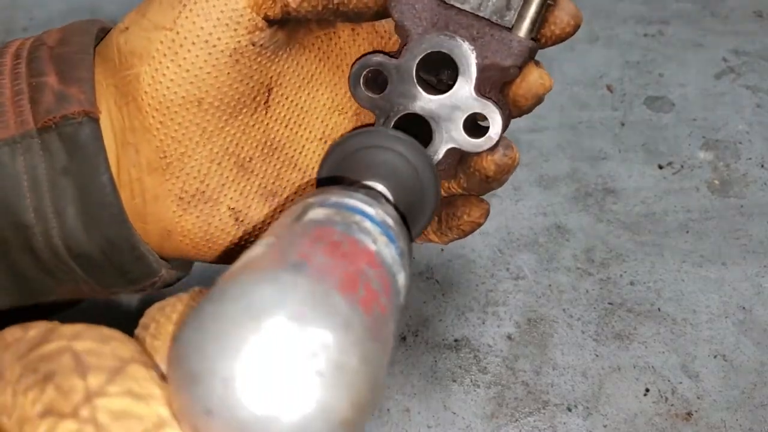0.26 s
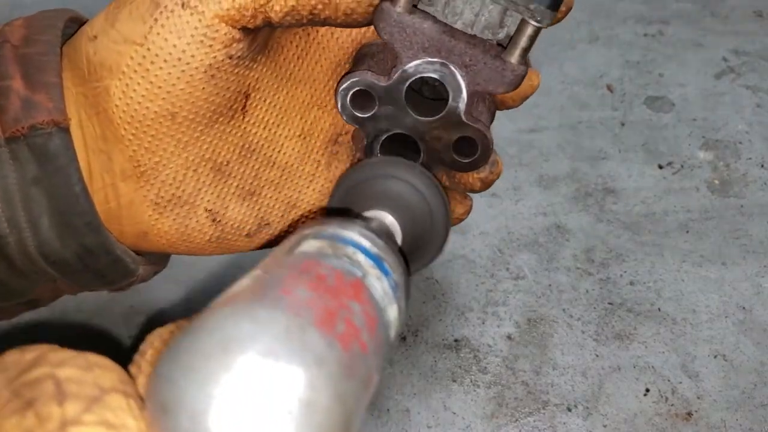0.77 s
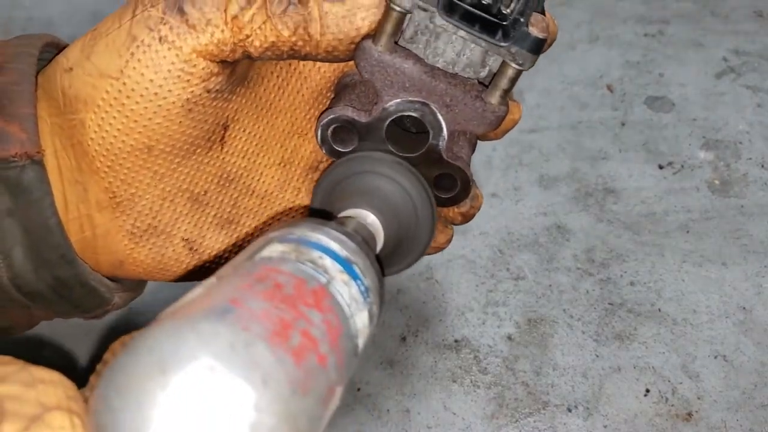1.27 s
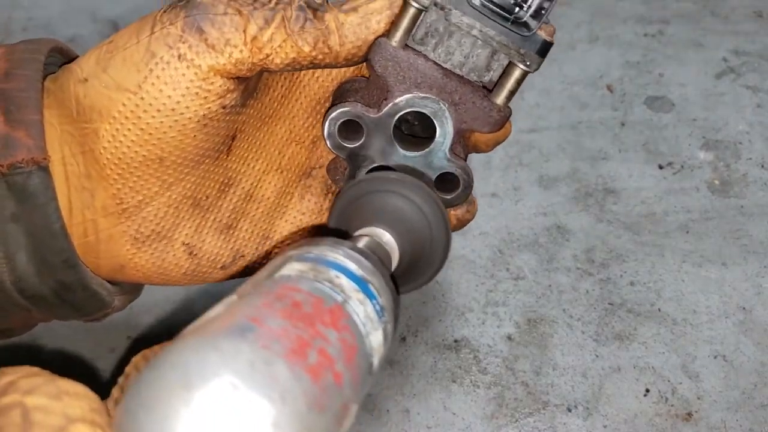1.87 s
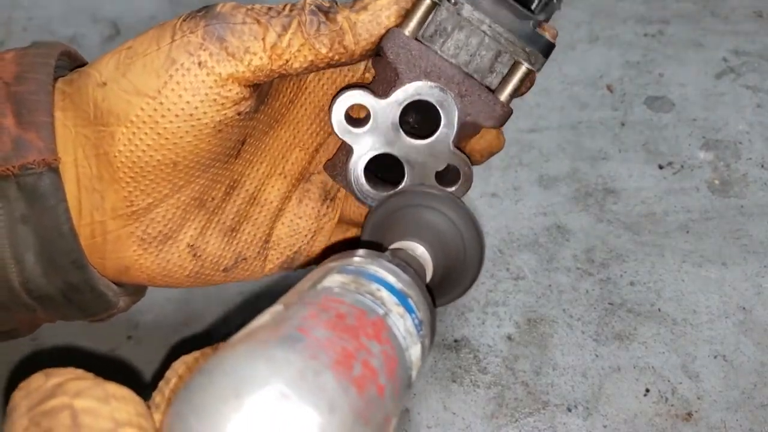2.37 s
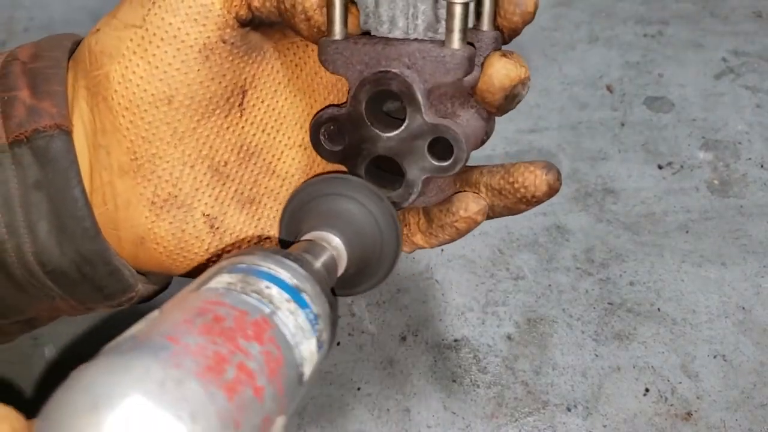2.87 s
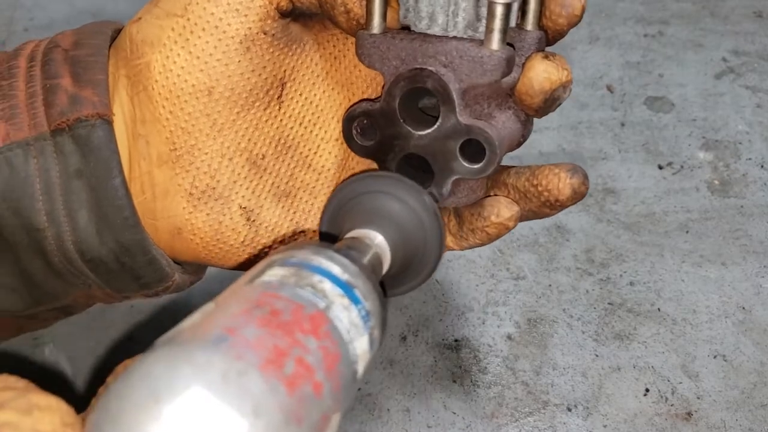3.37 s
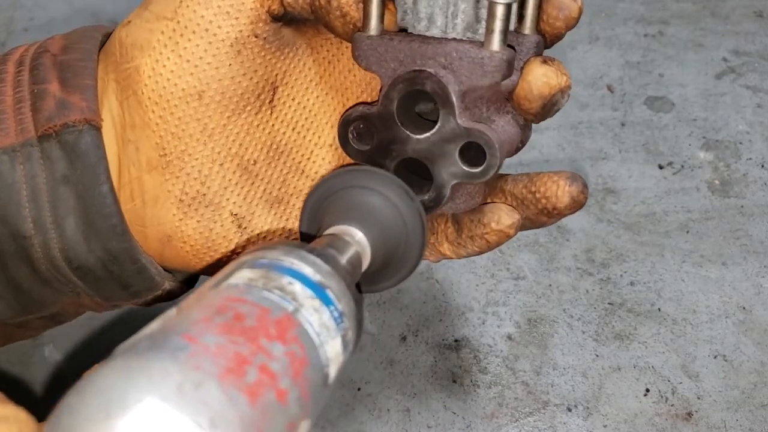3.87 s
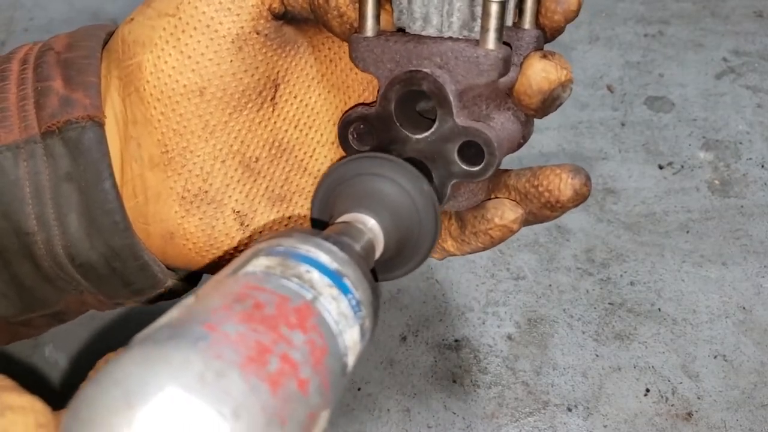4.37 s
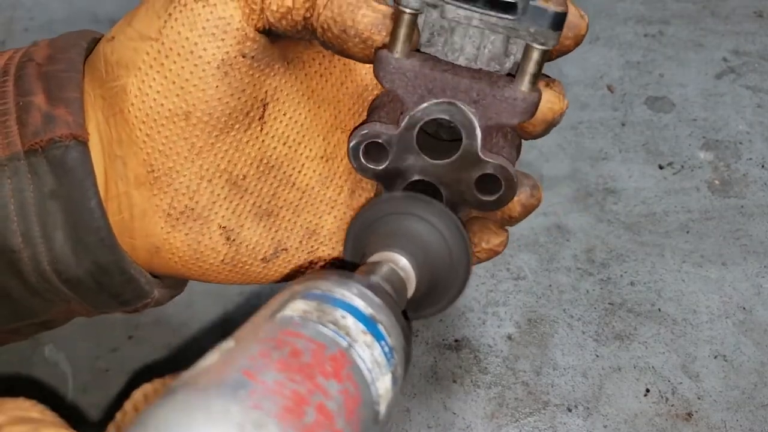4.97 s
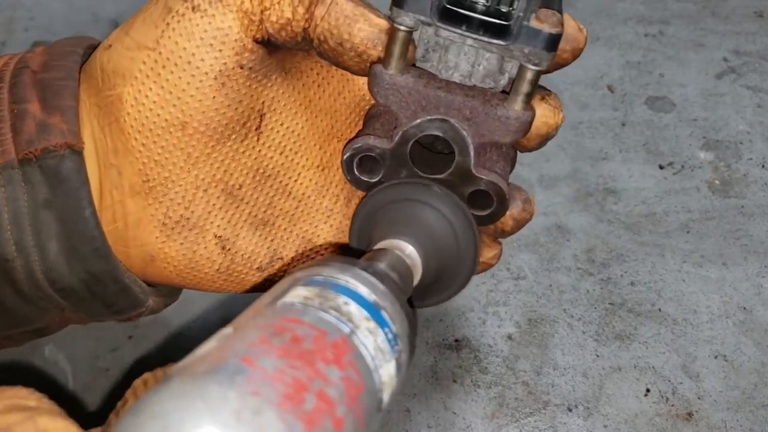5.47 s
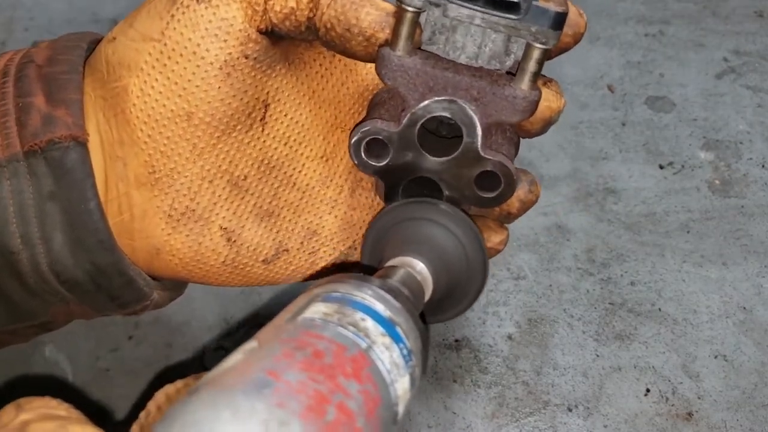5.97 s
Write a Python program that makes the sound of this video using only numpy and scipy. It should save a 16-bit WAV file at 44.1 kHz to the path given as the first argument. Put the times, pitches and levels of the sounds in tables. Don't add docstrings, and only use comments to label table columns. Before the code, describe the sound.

A pneumatic grinder hisses loudly near the microphone, heavier on the left, with a gritty motor buzz and disc scrape. Pressed hard at first, it growls low; after a short release with a puff of air it restarts with a higher whine. The pitch slides down, a high metallic squeal rises, and a second quick release follows. The last run starts highest and sags. Faint room tone shows in the gaps.

```python
import sys
import numpy as np
from scipy import signal
from scipy.fft import rfft, irfft
from scipy.io import wavfile
from scipy.ndimage import uniform_filter1d

SR = 44100
rng = np.random.default_rng(int(sys.argv[2]) if len(sys.argv) > 2 else 0)


def boost(x):
    u = np.asarray(x, float) / 20
    return 10 ** u


def materialize(psi):
    bounded = np.clip(np.atleast_2d(psi).T, -1, 1)
    quanta = np.round(bounded * 32767).astype(np.int16)
    wavfile.write(sys.argv[1], SR, quanta)


N = 274302
STEP = 16
MID_HZ = 550

# [freq_hz, lead_rad]
PORT_LEAD = [(0, -4), (250, 0.2), (1290, 1.5), (2930, 6.5), (5860, 4), (16700, 14.5)]
# [let_go_s, eased_open_s, full_speed_s, shake_down_db, shake_up_db]
RELEASES = [
    (2.5, 2.63, 2.76, -27, -54),
    (4.631, 4.735, 4.787, -43, -46),
]
# [time_s, rub_db]
PRESSURE = [(0, -46), (.88, -45), (.96, -34.5), (1.1, -37), (1.27, -32), (1.52, -38.5), (1.65, -35),
            (1.75, -42), (2.2, -40.5), (2.44, -36.5), (2.76, -49.5), (3.06, -48), (3.4, -50), (4.3, -52),
            (4.58, -46), (5.2, -48), (5.35, -41.5), (6.22, -45)]


def evened(x):
    return x / np.sqrt(np.mean(x ** 2) + 1e-20)


def read(points, hz):
    f, value = np.transpose(points)
    return np.interp(np.log(hz + 1), np.log(f + 1), value)


def curves(tables, t):
    s, *columns = np.concatenate(tables).T
    return [np.interp(t, np.maximum.accumulate(s), c) for c in columns]


def hump(hz, centre_hz, width_hz):
    return 1 / (1 + (2 * (hz - centre_hz) / width_hz) ** 2)


def full(control):
    return np.interp(np.arange(N), np.arange(0, N, STEP), control)


def pieces(count, fade_s=0.011, mean_s=.045):
    draws = rng.standard_normal((400, 1 + count))
    ends_s = np.cumsum(mean_s * np.exp(.5 * draws[:, 0]))
    index = np.searchsorted(ends_s, np.arange(0, N, STEP) / SR)
    stepped = draws[index.clip(0, len(ends_s) - 1), 1:]
    return uniform_filter1d(stepped, 1 + int(fade_s * SR / STEP), axis=0).T


def resonate(x, hz, width_hz):
    turn = np.exp(2j * np.pi * np.cumsum(hz) / SR)
    r = np.exp(-np.pi * width_hz / SR)
    once = signal.lfilter([1 - r], [1, -r], x / turn + 1e-18)
    twice = signal.lfilter([1 - r], [1, -r], once)
    return evened((turn * twice).real)


def held(t):
    # [time_s, shaft_hz, flow_db]
    stretches = [
        [(0, 456.6, -31), (.45, 467.7, -31), (.87, 448.8, -32), (1.08, 416.3, -32.5), (1.72, 420.1, -30),
         (2.47, 417.2, -31)],
        [(2.78, 673.2, -29), (3.57, 650.7, -29.5), (3.68, 620.2, -29), (3.85, 605.5, -30.5), (4.12, 597.2, -30),
         (4.46, 538.4, -32)],
        [(4.81, 714, -29), (4.93, 700, -28), (5.3, 574.5, -29.5), (5.62, 594.2, -29), (5.89, 537.5, -29),
         (6.07, 554, -28.5)],
    ]
    stretch = np.searchsorted([row[0] + .05 for row in RELEASES], t)
    return np.choose(stretch, [curves([table], t) for table in stretches])


def trigger(t):
    bleed_db, bleed_s, drain_db_per_s = -5, 0.015, 138
    coast_s, crawl = .055, .22
    shake_hz, shake_power = 394, 2.8
    eased_db, ease_s, opening_s, surge_db, surge_s = -8.5, 0.059, 0.021, 2.5, .04
    hz, flow_db = held(t)
    drop_db, shut, shake = np.zeros((3, len(t)))
    for off_s, eased_s, full_s, down_db, up_db in RELEASES:
        since_s = np.maximum(t - off_s, 0)
        open_s = (eased_s + full_s) / 2
        u = np.clip((t - eased_s) / (full_s - eased_s), 0, 1)
        spin = u ** 2 * (3 - 2 * u)
        before_hz, after_hz = held(np.array([off_s, full_s]))[0]
        coast_hz = before_hz * (crawl + (1 - crawl) * np.exp(-since_s / coast_s))
        hz = np.where((t > off_s) & (t < full_s), coast_hz * (1 - spin) + after_hz * spin, hz)

        closing = np.clip((t - off_s) / bleed_s + 1, 0, 1)
        opening = np.clip((t - open_s) / opening_s + .5, 0, 1)
        easing = np.clip((t - eased_s) / ease_s + .5, 0, 1)
        trapped = boost(bleed_db * closing - drain_db_per_s * since_s)
        eased = boost(eased_db) * easing
        surge = boost(surge_db * np.exp(-(np.maximum(t - open_s - surge_s, 0) / surge_s) ** 2))
        drop_db += 20 * np.log10(np.hypot(trapped, eased) * (1 - opening) + surge * opening)
        shut += closing * (1 - easing) ** 2

        running_down = boost(down_db) * np.clip(since_s / bleed_s, 0, 1) * (1 - u) ** 2
        running_up = boost(up_db) * np.sin(np.pi * spin)
        shake += (running_down + running_up) * np.minimum(hz / shake_hz, 1) ** shake_power
    return hz, flow_db, drop_db, shut, shake


def running(share):
    drop_db = trigger(np.arange(0, N, STEP) / SR)[2]
    return boost(share * full(np.minimum(drop_db, 0)))


def shaft(t):
    hz, _, drop_db, _, shake = trigger(t)
    fast_hz = hz - MID_HZ
    fade_db = 1.4 * np.minimum(drop_db, 0)
    unbalance = boost(-47.5 - 0.015 * fast_hz + fade_db) + shake
    vane_db = -41 + .09 * np.minimum(fast_hz, 110) + fade_db
    over_db = -49 + .025 * fast_hz + fade_db
    return hz, 20 * np.log10(unbalance), vane_db, over_db


def air(t):
    _, flow_db, drop_db, shut, _ = trigger(t)
    fast_hz = held(t)[0] - MID_HZ
    low_db = 2.5 - 0.0038 * fast_hz + 9 * uniform_filter1d(shut, size=5) + np.maximum(drop_db, 0)
    rumble_db = 0.5 - 0.017 * fast_hz - 1.05 * np.minimum(drop_db, 0) - 2.5 * shut
    return flow_db + drop_db, low_db, rumble_db


def garage(level_db=-51.5):
    # [freq_hz, level_db]
    room = [(30, -12), (150, -0.5), (600, -6.5), (1200, -0.5), (2000, -12), (5000, -13), (15000, -19)]
    a, b = rng.standard_normal((N, 2)).T
    both = rfft(np.array([a + 0.54 * b, a - 0.73 * b])) * boost(read(room, np.fft.rfftfreq(N, 1 / SR)))
    return boost(level_db) * evened(irfft(both, N))


def valve():
    # [time_s, half_length_s, level_db, centre_hz, width_hz]
    puffs = [
        (4.642, .017, -29, 2900, 900),
        (2.1, 0.013, -36.5, 2340, 900),
        (2.51, .01, -33, 1160, 300),
    ]
    t, out = np.arange(N) / SR, np.zeros((2, N))
    length = int(.13 * SR)
    for s, half_s, db, hz, width_hz in puffs:
        near = slice(int((s - .06) * SR), int((s + .06) * SR))
        swell = np.exp(-((t[near] - s) / half_s) ** 2)
        for side, side_db in enumerate([3., -4.]):
            band = resonate(rng.standard_normal(length), np.full(length, float(hz)), width_hz)
            out[side, near] += boost(db + side_db) * band[:len(swell)] * swell
    return out


def sing(hz=4570., width_hz=170, edge_s=.04):
    # [from_s, to_s, level_db]
    spells = [
        (5.02, 5.8, -37),
    ]
    t = np.arange(N) / SR
    size = sum(boost(db) * np.clip(np.minimum(t - a, b - t) / edge_s, 0, 1) for a, b, db in spells)
    tone = resonate(rng.standard_normal(N), np.full(N, hz), width_hz)
    return size * tone * boost(np.array([[3.], [-4.]]))


def squeal(waver_db=2.5):
    # [time_s, ring_db]
    fits = [
        (0, -44),
        (2.4, -43),
        (2.9, -44),
        (4.1, -28),
        (4.6, -45),
        (5.6, -35),
        (6.22, -35),
    ]
    ring_db = curves([fits], np.arange(N) / SR)[0] + waver_db * full(pieces(count=1)[0])
    ring = boost(ring_db) * resonate(rng.standard_normal(N), np.full(N, 10740.), 150.7)
    return ring * running(1.2) * boost(np.array([[-3.], [-19.]]))


def disc(width_hz=170, wobble_hz=35):
    db = curves([PRESSURE], np.arange(N) / SR)[0]
    hz = 1345 + 6 * (db + 45) + wobble_hz * full(pieces(count=1)[0])
    near, far = (resonate(rng.standard_normal(N), hz, width_hz) for _ in range(2))
    return boost(db) * running(1.7) * np.array([boost(2) * near, boost(-12) * far])


def motor(wander=.004, jump_rad=1.76, waver_db=1.24, high_waver_db=4.0, rough=0.19, rough_s=.006):
    # [shaft_multiple, pressed_hard_db, running_light_db, last_stretch_db, right_port_db]
    orders = [(.5, -9, -12, -16.5, -1.5), (1.62, -5.5, .5, -2.5, -6), (2, -8.5, -3.5, -0.5, 1.5),
              (2.5, 0.5, 2, 0, -6), (3, 9, -10, -10, -1), (5, 9, 4.5, -4, -3.5), (6, 2, -4, -0.5, 0.5),
              (7, -13, 2.5, -14, -5), (9, 8, -12.5, -11, -23)]
    # [freq_hz, width_hz, left_db, right_db]
    housing = [(4590, 570, -1, -6), (7600, 400, -1, -12), (10760, 330, -0.5, -14), (12350, 900, 2, .5)]
    nose = {5: (2800, 400, 8), 7: (4500, 700, 10)}
    light_from_s, last_from_s = 2.6, 4.72
    t = np.arange(0, N, STEP) / SR
    hz, unbalance_db, vane_db, over_db = shaft(t)
    last = np.clip((t - last_from_s) * 20, 0, 1)
    light = np.clip((t - light_from_s) * 20, 0, 1)

    rows = [(1, unbalance_db, -1.0), (4, vane_db - .5 + 2.2 * last, -10.0)]
    rows.append((1.75, unbalance_db - 4 - 40 * np.clip((hz - 330) / 60, 0, 1), -5))
    for k, hard_db, soft_db, late_db, right_db in orders:
        db = over_db + hard_db + light * (soft_db - hard_db) + last * (late_db - soft_db)
        rows.append((k, db, right_db))
    sizes = []
    for k, db, right_db in rows:
        if k in nose:
            centre_hz, width_hz, lift_db = nose[k]
            db = db + light * lift_db * hump(k * hz, centre_hz, width_hz)
        sizes.append((k, boost(db), boost(db + right_db), waver_db))

    drive = boost(over_db + 7.3 * (0.5 + light) - 2.0 * last)
    for k in [8, *range(10, 28)]:
        shapes = [(hump(k * hz, f, w) ** 2, l_db, r_db) for f, w, l_db, r_db in housing]
        left = drive * sum(h * boost(l_db) for h, l_db, _ in shapes)
        right = drive * sum(h * boost(r_db) for h, _, r_db in shapes)
        sizes.append((k, left, right, high_waver_db))

    off, *chance = pieces(count=1 + 2 * len(sizes))
    stumble = .018 * (1 - light) * np.clip((curves([PRESSURE], t)[0] + 45) / 4, 0, 1)
    turn = 2 * np.pi * np.cumsum(full(hz * (1 + (wander + stumble) * off))) / SR
    grit = rng.standard_normal((len(t), len(sizes), 2))
    shake = evened(uniform_filter1d(grit, 1 + int(rough_s * SR / STEP), axis=0))
    out = np.zeros((2, N))
    for j, (k, left, right, spread_db) in enumerate(sizes):
        size = np.sqrt(2) * boost(spread_db * chance[2 * j + 1]) * np.exp(1j * jump_rad * chance[2 * j])
        size = size * (1 + rough * (1 + k / 12) * (shake[:, j, 0] + 1j * shake[:, j, 1]))
        ports = np.array([left * size, right * size * np.exp(-1j * read(PORT_LEAD, k * hz))])
        out += (np.repeat(ports, STEP, axis=1)[:, :N] * np.exp(1j * k * turn)).imag
    return out


def exhaust(patchy_db=1.0, flicker_db=0.82, base_db=6.0, drift_rad=1.9, comb_db=0.5):
    # [freq_hz, level_db]
    left_path = [(30, -17), (150, -13), (400, -13), (750, -22.5), (1200, -9.5), (1850, -10), (2500, -3.5),
                 (3200, -7.5), (5100, -5), (6000, -0.5), (8400, -7), (10200, 1), (13000, 1.5), (15700, 1.5)]
    right_path = [(30, -14), (150, -7), (400, -16), (750, -9.5), (1200, -14), (1800, -8), (2400, -2),
                  (4000, -8), (5700, -12.5), (6700, -4.5), (9500, -1.5), (11700, 2), (13300, 2.5),
                  (15700, 3.5)]
    # [freq_hz, width_hz, left_db, right_db]
    body = [(4530, 355, 7, 13.5), (7486, 620, 8, 6), (12400, 750, 1.5, 4), (4270, 250, 3, 6.5),
            (11700, 600, -2, 2.5), (610, 84, -0.5, -0.5), (1860, 270, -5.5, -3), (3370, 260, -3.5, 3.5),
            (5080, 160, -4, 1)]
    # [freq_hz, likeness_0_to_1]
    likeness = [(60, 1), (300, 0.62), (800, 0.75), (1500, 0.32), (3000, 0.58), (6000, 0.39), (15000, 0.44)]
    # [time_s, left_over_right_db]
    balance = [(0, 6.5), (1.2, 7), (1.8, 5), (2.8, 6.5), (4.5, 6), (6.22, 4.5)]
    frames, hz = N // 128 + 5, np.fft.rfftfreq(512, 1 / SR)
    t = np.arange(frames) * 128 / SR
    a, b, c, d, patches, drift = rng.standard_normal((frames, 257, 6)).T
    drift = evened(uniform_filter1d(uniform_filter1d(drift, 6, 0), 80, 1))
    drift = drift * drift_rad * (hz / (hz + 900))[:, None]
    patches = evened(uniform_filter1d(uniform_filter1d(patches, 5, 0), 25, 1))
    flicker = evened(uniform_filter1d(rng.standard_normal(frames), 2))

    same = np.clip(read(likeness, hz), 0, 1)[:, None]
    left = a + 1j * b
    shared = same * left * np.exp(-1j * (read(PORT_LEAD, hz)[:, None] + drift))
    right = shared + np.sqrt(1 - same ** 2) * (c + 1j * d)

    flow_db, low_db, rumble_db = air(t)
    deep = (1 / (1 + (hz / 260) ** 4))[:, None]
    low = (1 / (1 + (hz / 5000) ** 6))[:, None] - deep
    field_db = patchy_db * patches + flicker_db * flicker + low * low_db + deep * rumble_db
    speed_hz = shaft(t)[0]
    comb = np.cos(2 * np.pi * hz[:, None] / speed_hz)
    field_db += comb_db * low * comb * np.clip((speed_hz - 330) / 60, 0, 1)

    out = []
    for k, (z, path) in enumerate([(left, left_path), (right, right_path)]):
        colour = boost(read(path, hz) + sum(m[2 + k] * hump(hz, *m[:2]) for m in body))
        level = boost(flow_db + base_db + curves([balance], t)[0] * (1.0 - k)) / np.sqrt(np.mean(colour ** 2))
        spectrum = z * colour[:, None] * boost(field_db) * level
        out.append(signal.istft(spectrum, nperseg=512, noverlap=384)[1][:N] / 16)
    return np.array(out)


def splices(step_db=-0.1, depth=0.59):
    # [time_s, depth_db, width_ms]
    gaps = [(0.286, 23, 7.4), (.408, 5, 7), (.515, 3.5, 16), (.746, 8, 8.9), (.793, 15, 7.8),
            (0.93, 4, 7.4), (1.036, 6, 8.6), (1.123, 2, 9), (1.255, 2, 6.1), (1.395, 11, 2.5),
            (1.617, 6, 7), (1.794, -2, 4), (2.207, 1, 3.8), (2.414, 14, 7.3), (2.957, 2, 3.59),
            (3.785, 9, 7.2), (3.929, 3, 7), (4.597, 11, 8.5), (5.217, 3, 4), (5.504, 8.5, 11.8)]
    t, db = np.arange(N) / SR, step_db * full(pieces(count=1)[0])
    for s, depth_db, ms in gaps:
        near = slice(max(int((s - .03) * SR), 0), int((s + .03) * SR))
        db[near] -= depth * depth_db * np.exp(-(2000 * (t[near] - s) / ms) ** 4)
    return boost(db)


def scene():
    tool = exhaust() + motor() + disc() + squeal() + sing() + valve()
    return (tool + garage()) * splices()


def roll_off(x):
    return signal.sosfilt(signal.butter(12, 17100, fs=SR, output="sos"), x)


def record(dry):
    edge = signal.firwin(511, 15800, window=("kaiser", 9), fs=SR)
    mix = signal.oaconvolve(dry, edge[None], "same")
    return roll_off(mix)


dry = scene()
out = record(dry)
materialize(out)
```